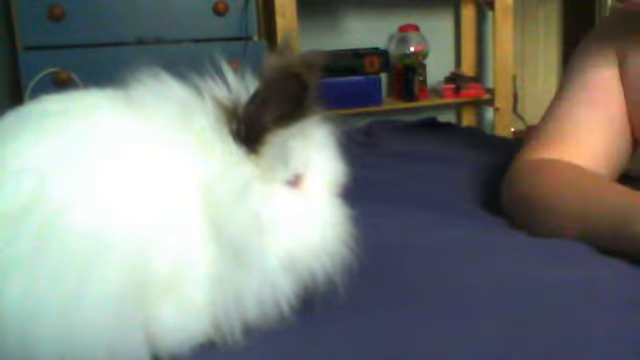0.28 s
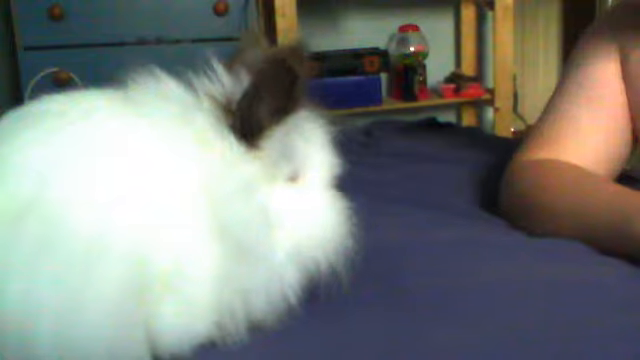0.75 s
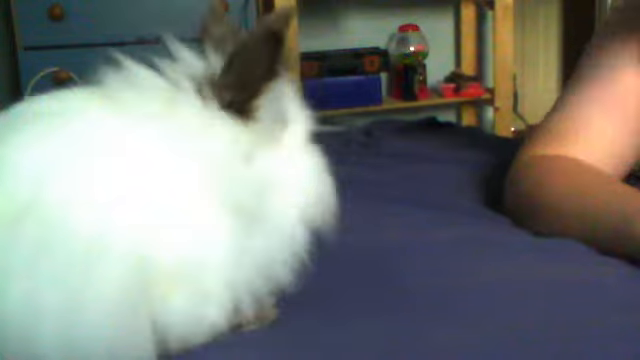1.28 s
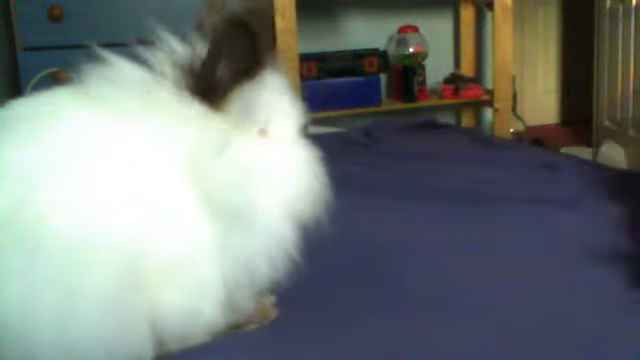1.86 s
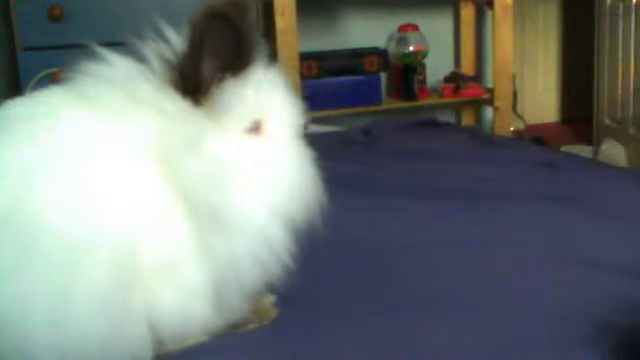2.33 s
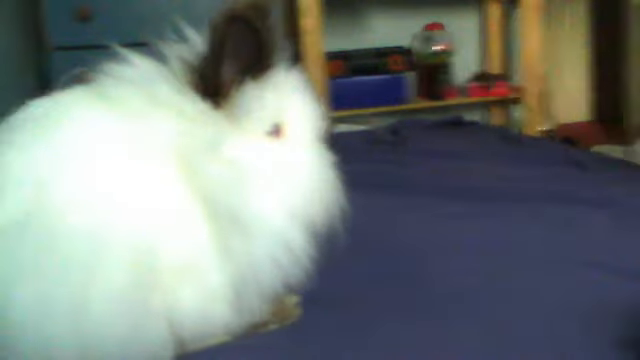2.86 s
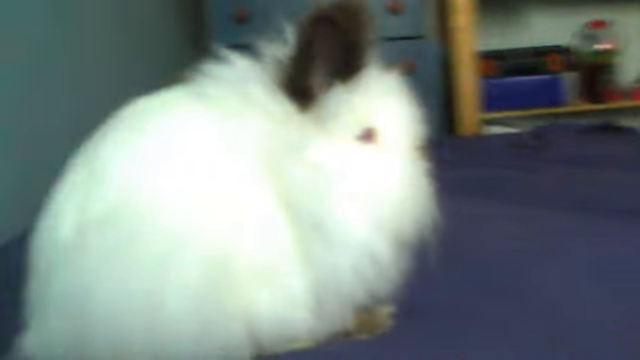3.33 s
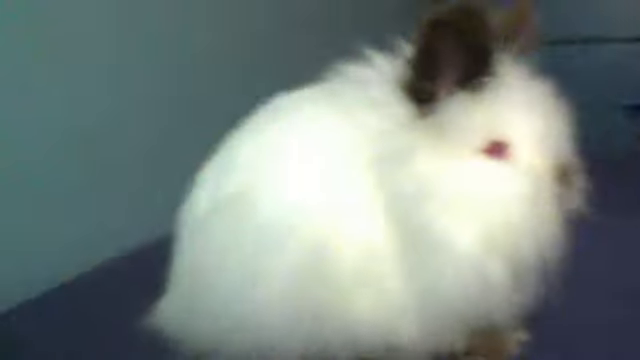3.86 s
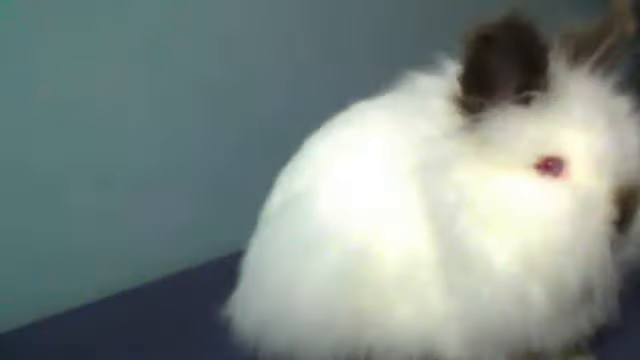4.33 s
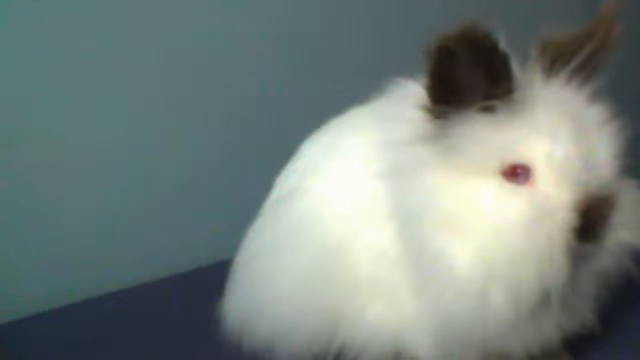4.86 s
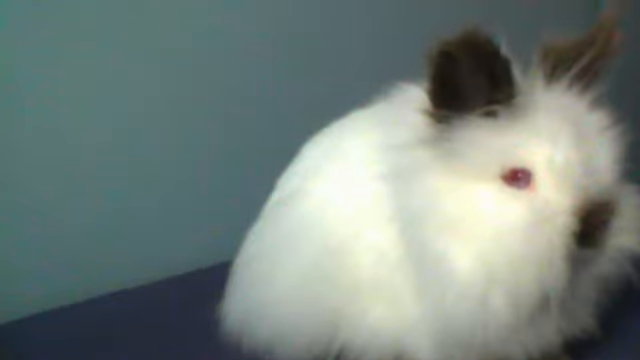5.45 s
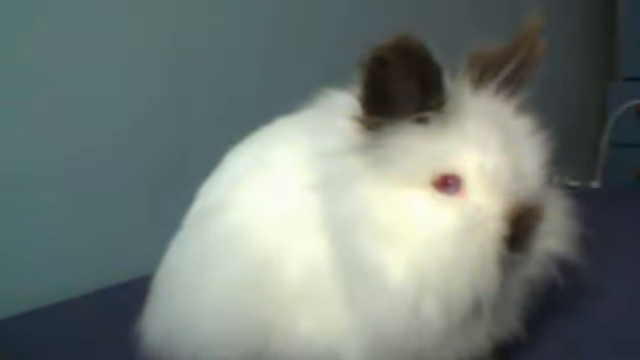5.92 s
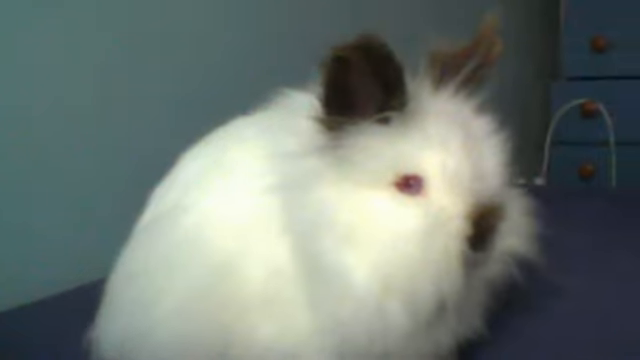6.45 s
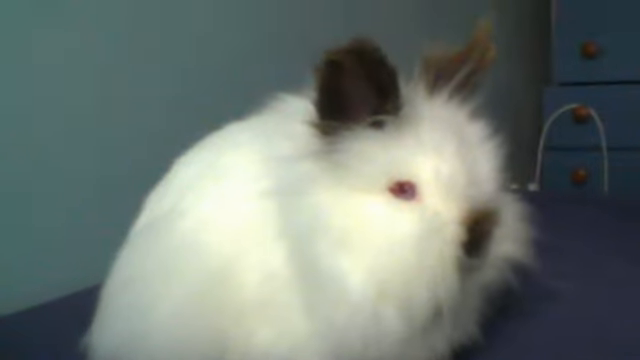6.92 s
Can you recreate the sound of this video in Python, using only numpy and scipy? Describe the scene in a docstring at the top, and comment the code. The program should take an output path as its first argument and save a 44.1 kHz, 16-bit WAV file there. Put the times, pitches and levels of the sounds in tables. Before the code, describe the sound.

Low buzzing hum and steady fan noise fill the opening, almost undisturbed. Then soft rustling swells and dips, dotted with small dry clicks and dull bumps from a plastic case gripped at the microphone itself. Just past five seconds comes a violent crack-like knock, with scratchy finger rubs and tiny squeaks. A ratcheting creak and a few light taps fade into louder hum, in a small indoor room.

```python
"""Webcam turned by hand beside a computer

Small bedroom, running computer close by: mains hum, fan and disk tones and whine as sines, rumble and hiss as noise.
A hand takes the camera and turns it: sliding cloth and rubbing fingers are shaped noise, squeaks a narrow band of it.
At no distance from the microphone, the plastic case clicks, knocks and creaks: noise cracks over decaying modes.
The mains hum swells under the gripping hand, with dips between.
"""
import sys
import numpy as np
from scipy import signal
from scipy.fft import rfft, irfft, next_fast_len
from scipy.io import wavfile

SR = 44100
rng = np.random.default_rng(int(sys.argv[2]) if len(sys.argv) > 2 else 0)


def unload_audio(sound):
    """Save the sound as a 16-bit wav file, at the path given as the first command line argument."""
    columns = np.transpose(np.atleast_2d(sound))
    # keep every value between -1 and 1, then stretch to whole-number steps
    steps = np.round(np.clip(columns, -1, 1) * 32767)
    wavfile.write(sys.argv[1], SR, steps.astype(np.int16))


N = 317253
TIME = np.arange(N) / SR
BLOW = TIME[:8192]  # time axis of one blow, s

# Mains hum. Each row: multiple of the mains frequency, level in dB against the fundamental.
MAINS_HZ = 50
MAINS_HARMONICS = [(1, 0), (3, -14), (5, -22.5), (7, -30), (11, -33)]
# Hum that the hand picks up and feeds in. Each row: time in seconds, level of the fundamental in dB rms.
HUM_PICKUP = [(0.3, -39.5), (2.35, -37.5), (3.2, -42.5), (4.96, -37.5), (5.15, -30.5), (5.77, -29.5),
              (6.59, -29), (6.7, -36), (6.78, -31.5), (7.1, -32)]
HUM_REFERENCE_DB = -35  # level of the fundamental at which the harmonics stand as listed
# Fan. Each row: multiple of the turning rate, level in dB rms.
FAN_HZ = 94.95
FAN_TONES = [(1, -48.5), (3, -70), (4, -60), (7, -57), (8, -60), (9, -61), (12, -56), (16, -62.5),
             (20, -64.5), (21, -63), (25, -60.5), (33, -66), (34, -75), (44, -75)]
# Disk. Each row: multiple of the turning rate, level in dB rms.
DISK_HZ = 90.05
DISK_TONES = [(1, -40), (9, -64), (36, -74)]
# Electrical whine. Each row: multiple of the base frequency, level in dB rms.
WHINE_HZ = 200
WHINE_TONES = [(1, -59.5), (2, -64), (4, -60), (5, -74), (6, -70), (9, -64), (10, -70.5), (11, -66),
               (12, -65.5), (15, -75), (17, -68), (19, -64.5), (20, -71), (22, -65.5), (23, -87), (24, -68),
               (25, -61.5), (27, -66.5), (32, -74), (33, -69), (35, -69), (38, -74), (40, -68), (43, -92)]
# Steady low noise. Each row: frequency in Hz, power in dB per Hz.
RUMBLE_SPECTRUM = [(3, -48.5), (8, -50.5), (28, -63), (45, -70), (70, -72), (130, -83.5), (300, -107)]
# Steady hiss. Each row: frequency in Hz, power in dB per Hz.
HISS_SPECTRUM = [(100, -73), (300, -78.5), (520, -80), (800, -77.5), (1000, -79.5), (1600, -80.5),
                 (2350, -86), (2550, -88), (3300, -87), (5300, -86), (5650, -88), (8000, -93), (9300, -98),
                 (9700, -105)]

# The camera sways in the hand. Each row: start in seconds, length in seconds, level in dB against the
# rumble, release in seconds.
SWAYS = [(2.4, 4.75, -3.5, 0.23)]
SWAY_ATTACK_S = 0.14
# Sliding cloth. Each row: frequency in Hz, relative power in dB per Hz.
CLOTH_SPECTRUM = [(250, -3), (560, -7), (820, 6.5), (1080, -7.5), (1600, -1.5), (2280, 4.5), (2600, -7),
                  (3350, 4.5), (4200, 0), (6600, 2.5), (7300, -4), (8400, -7.5), (9300, -8.5),
                  (9650, -21.5)]
# Strokes of the cloth as the camera turns. Each row: start in seconds, length in seconds, full level in
# dB rms, release in seconds.
CLOTH_SLIDES = [(2.52, 1.92, -37.5, 0.6), (3.92, 0.66, -37.5, 0.07), (4.56, 0.245, -37.5, 0.05)]
SLIDE_ATTACK_S = 0.4
# Fingers rubbing the case. Each row: frequency in Hz, relative power in dB per Hz.
SKIN_SPECTRUM = [(200, 6.5), (500, -6.5), (1100, 2.5), (1700, -3.5), (2300, 2), (2650, -5.5), (3400, 3),
                 (4300, -1), (5200, 0.5), (6200, -3), (7200, -8), (9300, -12), (9700, -27)]
# Strokes of the fingers. Each row: start in seconds, length in seconds, full level in dB rms,
# release in seconds.
FINGER_RUBS = [(5.125, 0.14, -33, 0.06), (5.24, 0.11, -31.5, 0.037), (5.33, 0.19, -39.5, 0.02),
               (5.49, 0.24, -37, 0.14), (5.6, 0.38, -42.5, 0.096), (6.1, 0.21, -45, 0.075)]
RUB_ATTACK_S = 0.029
# Colour of a skin squeak. Each row: frequency in Hz, relative power in dB per Hz.
SQUEAK_SPECTRUM = [(4700, -17), (5400, -1), (5950, 7), (6400, -2), (7200, -41)]
# Skin squeaking on the plastic. Each row: start in seconds, length in seconds, full level in dB rms,
# release in seconds.
SKIN_SQUEAKS = [(5.165, 0.093, -38.5, 0.015), (5.262, 0.027, -28.5, 0.012), (5.287, 0.026, -32, 0.012)]
SQUEAK_ATTACK_S = 0.0072
# A rub at the first level rings the case at the second (dB rms); the ring grows as a power of the rub
FIRM_RUB_DB, FIRM_RING_DB, RING_GROWTH = -31.5, -27, 1.74

# Modes of the plastic case. Each row: frequency in Hz, starting level in dB before the ring is brought to
# peak 1, time to fall 60 dB in seconds.
CASE_MODES = [(310, -17.5, 0.051), (681, -3, 0.028), (824, 0.5, 0.045), (903, -0.5, 0.012),
              (1626, -15, 0.013)]
# Modes shaken by a dull bump. Each row: frequency in Hz, starting level in dB before the ring is brought to
# peak 1, time to fall 60 dB in seconds.
MOUNT_MODES = [(30, 0, 0.085), (131.3, 6, 0.028), (184, 5, 0.02), (256, -1.5, 0.029), (323, -1, 0.069),
               (460, -4, 0.044), (550, -8, 0.024)]
# Colour of sharp cracks through the shell. Each row: frequency in Hz, relative level in dB.
SHELL_COLOUR = [(600, 10.5), (1100, -1.5), (1650, 6), (2280, 10), (2650, -1), (3350, 7.5), (4300, -1),
                (5200, 3), (6300, -1.5), (7400, -6), (9300, -7.5), (10000, -21.5)]
# Dull bumps of the hand. Each row: time in seconds, peak level in dB.
HAND_BUMPS = [(1.647, -35), (2.682, -23.5), (2.7, -25), (2.734, -31), (2.821, -32), (3.755, -37),
              (3.951, -31), (4.486, -25.5), (4.534, -30), (4.74, -31.5), (5.134, -9), (5.145, -8.5),
              (5.757, -20.5)]
# Clicks and knocks of the case. Each row: time in seconds, peak of the ring in dB, level of the crack in
# dB, centre of the crack in Hz, sharpness of the crack as Q.
CASE_CLICKS = [(.014, -52, -29.5, 3880, 11), (1.6462, -50, -32.5, 6340, 2.1), (1.647, -36, -33.5, 3200, 2),
               (2.665, -32, -22, 3600, 2.6), (2.82, -29.5, -35, 2300, 1.1), (2.851, -34, -31, 2300, 1.1),
               (3.392, -29.5, -24.5, 3020, 0.45), (3.589, -37, -22, 6460, 2.2),
               (3.7535, -25, -16.5, 1870, 1.3), (3.7583, -24.5, -31, 2400, 2),
               (3.7853, -26.5, -29, 2200, 4.1), (3.878, -50, -14, 8400, 3.3), (3.8815, -24, -13, 2740, 3.6),
               (3.95, -25.5, -28.5, 1490, 0.78), (4.11, -30, -35, 2300, 0.86), (4.534, -29, -25, 3500, 1.6),
               (4.6422, -49, -22, 7100, 4.6), (4.672, -41, -35, 2340, 9.2), (4.706, -37, -28.5, 4200, 0.55),
               (5.089, -35, -36, 2200, 0.62), (5.13, -33, -20, 3300, 1.1), (5.1376, -4.5, -10.5, 4000, .5),
               (5.1422, -24, -11.5, 5400, 3.3), (5.1462, -2.5, -8, 6200, 3), (5.1505, -25, -13, 2420, 0.32),
               (5.1849, -14.5, -16.5, 5860, 15), (5.213, -11, -28.5, 1800, 1),
               (5.2928, -34, -18, 4280, 1.7), (5.32, -27, -25, 3800, 2.3), (5.367, -22.5, -42, 3000, 1.1),
               (5.3896, -18, -27, 2780, 1.1), (5.8145, -16, -37, 2600, .6), (6.05, -36, -35, 4160, 8),
               (6.13, -31.5, -35.5, 2500, 1.1), (6.664, -28.5, -31, 5470, 0.92),
               (6.686, -21.5, -37, 4530, 2.7)]
# The higher the crack, and the louder, the sooner it dies. The decay time holds for a crack of the
# middle pitch and light level, varies as a power of pitch and halves for every so many dB of level.
CRACK_DECAY_MS, CRACK_MIDDLE_HZ, CRACK_SHORTENING = 2.93, 3000, 0.35
LIGHT_CRACK_DB, CRACK_HALVING_DB = -25, 35.5
# Faint ticks of the shifting grip; ring and crack levels are dB against the stroke under way
TICKS_PER_S, TICK_SPREAD_DB = 10, 3
TICK_RING_DB, TICK_CRACK_DB, TICK_HZ, TICK_Q = 2.2, -2.5, 2300, 1.1
# Creaks of the swivel. Each row: start in seconds, length in seconds, peak of each ring in dB, level of
# the first crack in dB; slips then vary at random.
SWIVEL_CREAKS = [(2.677, 0.024, -22, -22.5), (5.7034, 0.075, -16.3, -30)]
SLIPS_PER_S, SLIPS_SPEEDUP_PER_S2 = 108, 800
SLIP_SOFTENING_DB_PER_S = 140  # on the cracks only

CUTOFF_HZ = 10524  # the treble ends here


def from_db(db):
    """Decibels to gain."""
    return 10 ** (np.asarray(db) / 20)


def rms_one(x):
    """Scale to rms 1."""
    return x / np.sqrt(np.mean(x ** 2) + 1e-20)


def colour(x, spectrum):
    """Filter by a (Hz, dB) curve, straight on a logarithmic frequency axis."""
    hz, db = np.transpose(spectrum)
    bins = np.maximum(np.fft.rfftfreq(len(x), 1 / SR), 1)
    gain = from_db(np.interp(np.log(bins), np.log(hz), db))
    return irfft(rfft(x) * gain, len(x))


def noise(spectrum):
    """Noise with the given power per Hz."""
    white = rng.standard_normal(next_fast_len(N))
    return colour(white, spectrum)[:N] * np.sqrt(SR / 2)


def flicker(per_s, depth_db):
    """A gain that wanders at random."""
    knots = rng.standard_normal(N // 10)
    return from_db(depth_db * np.interp(TIME * per_s, np.arange(len(knots)), knots))


def tones(hz, orders, wander=0):
    """Sines on multiples of one rate, which may wander by a small share."""
    speed = 1 + wander * np.interp(TIME * 2, np.arange(32), rng.standard_normal(32))
    turn = 2 * np.pi * hz * np.cumsum(speed) / SR
    out = np.zeros(N)
    for multiple, db in orders:
        phase = rng.uniform(0, 2 * np.pi)
        out += np.sqrt(2) * from_db(db) * np.sin(round(multiple) * turn + phase)
    return out


def strokes(rows, attack_s):
    """Gain in time of a set of strokes: each swells, holds and lets go; overlaps add in power."""
    power = np.zeros(N)
    for start, length, db, release_s in rows:
        swell = (TIME - start) / attack_s
        letting_go = (start + length - TIME) / release_s
        power += (from_db(db) * np.clip(np.minimum(swell, letting_go), 0, 1)) ** 2
    return np.sqrt(power)


def add(out, s, sound):
    """Mix a sound in at time s."""
    at = int(round(s * SR))
    out[at:at + len(sound)] += sound[:N - at]


def computer():
    """Fan, disk and the whine of the electronics over rumble and hiss."""
    fan = tones(FAN_HZ, FAN_TONES, wander=.0004)
    disk = tones(DISK_HZ, DISK_TONES)
    whine = tones(WHINE_HZ, WHINE_TONES)
    return fan + disk + whine + noise(RUMBLE_SPECTRUM) + noise(HISS_SPECTRUM)


def hum(overtone_growth=1.27):
    """Mains pickup is a rounded square wave; it grows squarer as it swells."""
    pickup = from_db(np.interp(TIME, *np.transpose(HUM_PICKUP)) - HUM_REFERENCE_DB)
    harmonics = []
    for multiple, db in MAINS_HARMONICS:
        wave = np.sin(2 * np.pi * round(multiple) * MAINS_HZ * TIME)
        harmonics.append(np.sqrt(2) * from_db(HUM_REFERENCE_DB + db) * wave)
    base, *overtones = harmonics
    return pickup * base + pickup ** overtone_growth * sum(overtones)


def sway():
    """The camera sways in the hand, heard as more rumble."""
    return strokes(SWAYS, SWAY_ATTACK_S) * noise(RUMBLE_SPECTRUM)


def cloth(slide):
    """Cloth slides smoothly: noise with a shallow flicker."""
    return slide * rms_one(noise(CLOTH_SPECTRUM) * flicker(per_s=150, depth_db=0.6))


def fingers(rub):
    """Fingers rub the case: noise with a slower, deeper flicker than the cloth."""
    return rub * rms_one(noise(SKIN_SPECTRUM) * flicker(per_s=62, depth_db=1.0))


def squeaks():
    """Skin squeaks on the plastic: a narrow band of fast-flickering noise."""
    squeal = strokes(SKIN_SQUEAKS, SQUEAK_ATTACK_S)
    return squeal * rms_one(noise(SQUEAK_SPECTRUM) * flicker(per_s=410, depth_db=1.5))


def ringing(modes):
    """Answer of a body to one blow, neighbouring modes in opposite sign; peak 1."""
    out = np.zeros(len(BLOW))
    for k, (hz, db, t60) in enumerate(modes):
        out += (-1) ** k * from_db(db - 60 * BLOW / t60) * np.sin(2 * np.pi * hz * BLOW)
    return out / np.abs(out).max()


def rubbed_case(rub):
    """Fingers catch and slip, ringing the case; the ring grows faster with pressure than the rub's hiss."""
    ring = from_db(FIRM_RING_DB) * (rub / from_db(FIRM_RUB_DB)) ** RING_GROWTH
    catches = rng.standard_normal(N) * flicker(per_s=610, depth_db=7)
    return ring * rms_one(signal.fftconvolve(catches, ringing(CASE_MODES))[:N])


def gripped_case(detune=0.024):
    """Every touch holds the case differently and shifts its modes a little."""
    return ringing([(hz * (1 + detune * rng.standard_normal()), db, t60) for hz, db, t60 in CASE_MODES])


def crack(centre_hz, decay_ms, sharpness, rise_share=1.0):
    """A burst of tiny fractures that builds and dies fast, heard through the shell around one pitch."""
    band = signal.iirpeak(min(centre_hz, SR / 4), max(sharpness, .5), fs=SR)
    age = 1000 * BLOW / max(decay_ms, .2)  # in decay times
    envelope = np.exp(-age) * (1 - np.exp(-age / rise_share))
    fractures = rng.standard_normal(len(BLOW)) * envelope
    burst = colour(signal.lfilter(*band, fractures), SHELL_COLOUR)
    burst[len(BLOW) // 2:] = 0  # drop what the filter wraps round to the end
    # give it the energy of a plain decay from level 1
    return burst * np.sqrt(np.sum(np.exp(-2 * age)) / np.sum(burst ** 2))


def click(ring_db, crack_db, crack_hz, sharpness):
    """A crack plus the hollow ring of the case."""
    pitch_factor = (CRACK_MIDDLE_HZ / crack_hz) ** CRACK_SHORTENING
    level_factor = 2 ** ((LIGHT_CRACK_DB - crack_db) / CRACK_HALVING_DB)
    snap = crack(crack_hz, CRACK_DECAY_MS * pitch_factor * level_factor, sharpness)
    return from_db(ring_db) * gripped_case() + from_db(crack_db) * snap


def ticks(motion):
    """The grip shifts at random moments and ticks about as strongly as the hand is moving."""
    out = np.zeros(N)
    shifts = (rng.random(N) < TICKS_PER_S / SR) & (motion > 0)
    for at in np.flatnonzero(shifts):
        db = 20 * np.log10(motion[at]) + TICK_SPREAD_DB * rng.standard_normal()
        add(out, at / SR, click(db + TICK_RING_DB, db + TICK_CRACK_DB, TICK_HZ, TICK_Q))
    return out


def creak(uneven_db=1.5):
    """The swivel sticks and slips ever faster, its cracks softening; each slip rings the case."""
    out, case = np.zeros(N), ringing(CASE_MODES)
    for start, length, ring_db, crack_db in SWIVEL_CREAKS:
        age = 0
        while age < length:
            snap_gain = from_db(crack_db - SLIP_SOFTENING_DB_PER_S * age)
            snap = snap_gain * crack(centre_hz=3080, decay_ms=3.63, sharpness=0.75)
            uneven = from_db(uneven_db * rng.standard_normal())
            add(out, start + age, uneven * (from_db(ring_db) * case + snap))
            age += 1 / (SLIPS_PER_S + SLIPS_SPEEDUP_PER_S2 * age)
    return out


def knocks():
    """The case clicks and knocks; bumps of the hand shake the mount."""
    out, mount = np.zeros(N), ringing(MOUNT_MODES)
    for s, *blow in CASE_CLICKS:
        add(out, s, click(*blow))
    for s, db in HAND_BUMPS:
        add(out, s, from_db(db) * mount)
    return out


def scene():
    """Handling reaches the microphone through the case, so it is dry."""
    slide = strokes(CLOTH_SLIDES, SLIDE_ATTACK_S)
    rub = strokes(FINGER_RUBS, RUB_ATTACK_S)
    background = computer() + hum()
    rustle = sway() + cloth(slide) + fingers(rub) + squeaks() + rubbed_case(rub)
    return (background + rustle + ticks(slide + rub) + creak() + knocks())[None]


def record(dry, top=0.51):
    """The loudest peaks are rounded towards a ceiling, then a steep low-pass cuts the treble."""
    rounded = dry / (1 + (dry / top) ** 4) ** (1 / 4)
    return signal.sosfilt(signal.butter(16, CUTOFF_HZ, fs=SR, output="sos"), rounded)


dry = scene()
out = record(dry)
unload_audio(out)
```